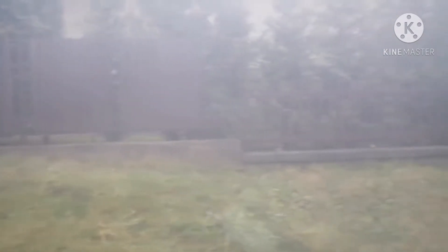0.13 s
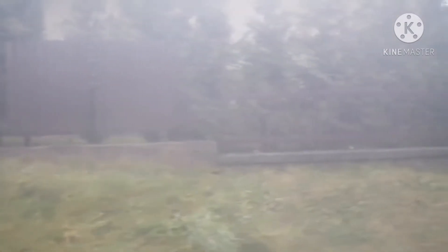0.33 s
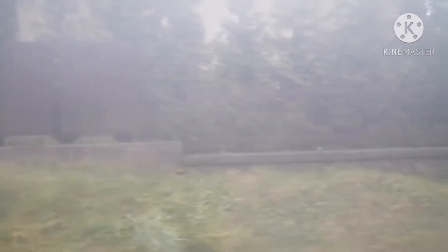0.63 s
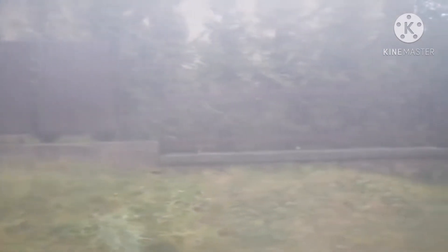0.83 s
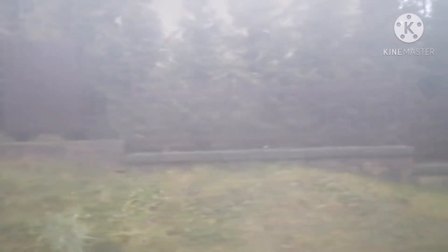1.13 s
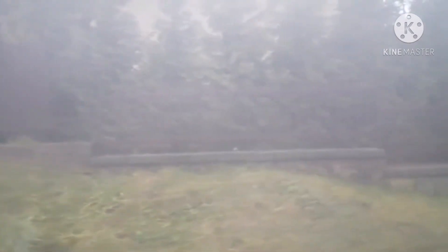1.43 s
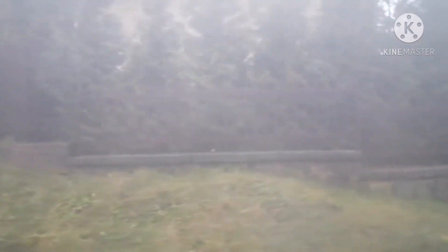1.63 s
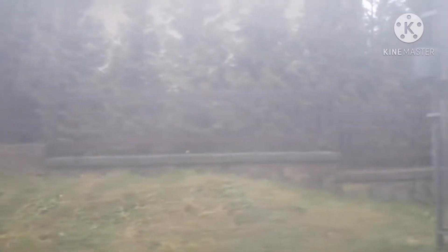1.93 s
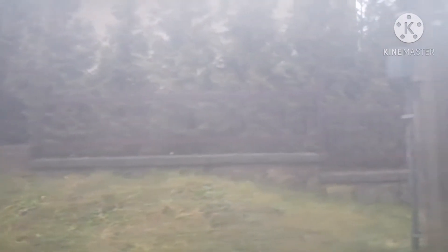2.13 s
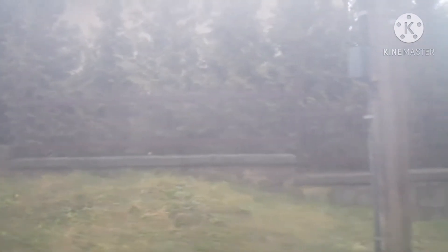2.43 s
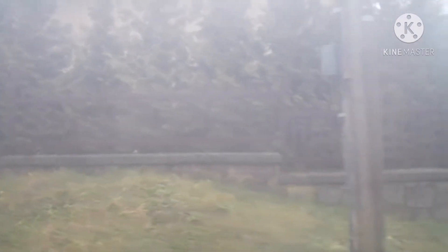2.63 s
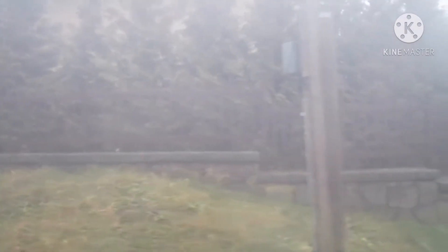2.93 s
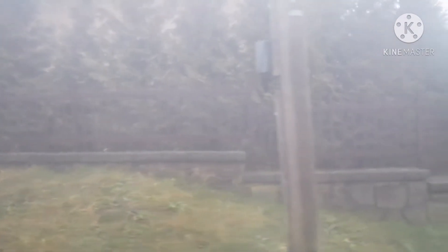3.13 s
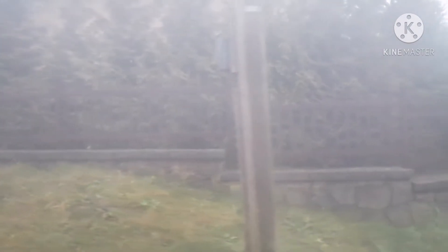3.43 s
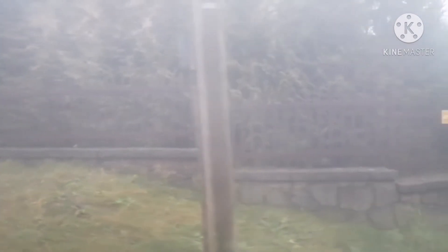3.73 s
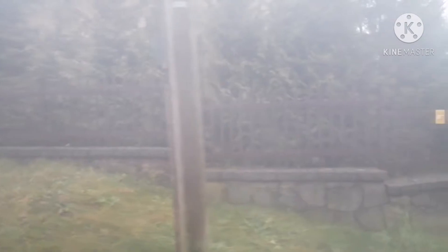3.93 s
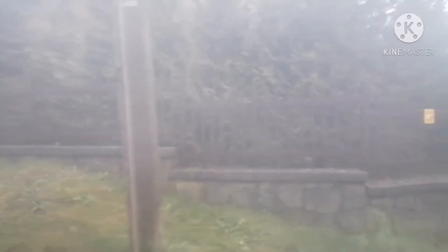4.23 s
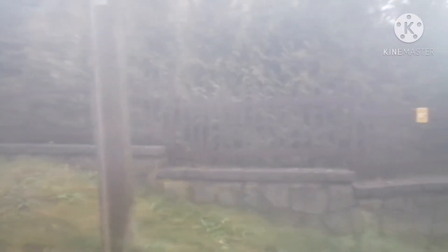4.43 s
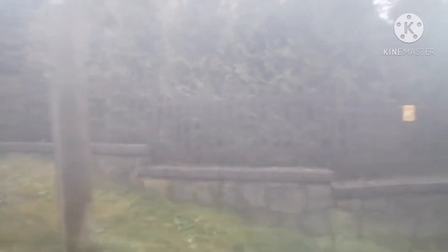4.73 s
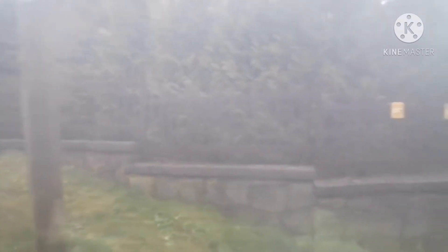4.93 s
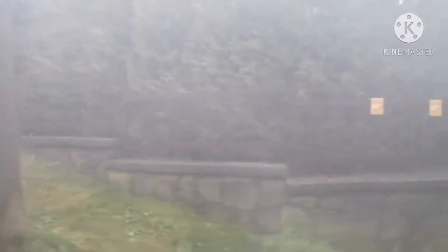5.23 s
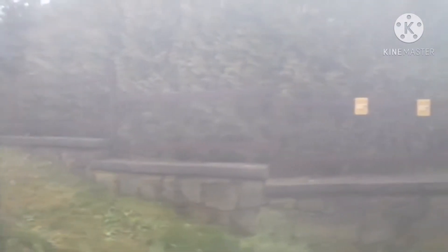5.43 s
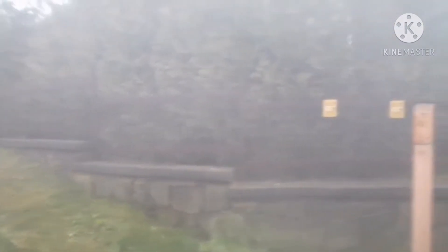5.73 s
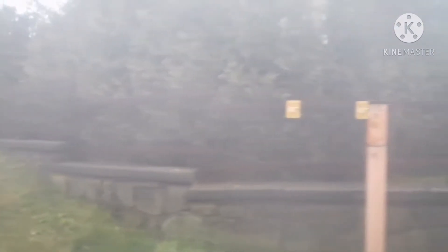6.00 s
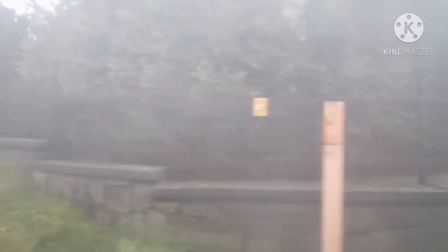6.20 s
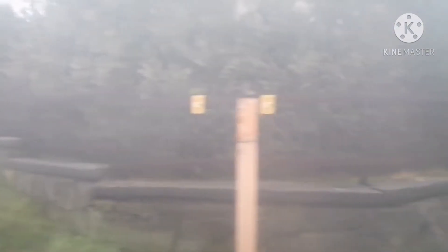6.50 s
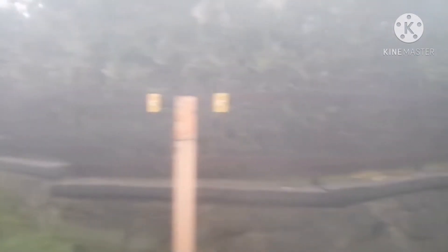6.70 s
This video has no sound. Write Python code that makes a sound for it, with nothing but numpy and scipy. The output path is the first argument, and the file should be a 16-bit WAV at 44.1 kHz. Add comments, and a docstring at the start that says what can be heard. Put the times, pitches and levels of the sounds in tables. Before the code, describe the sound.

Bus cabin interior: steady diesel hum and tyre rumble with small squeaks and air puffs, then a surging, louder, climbing engine roar.

```python
"""Diesel bus, inside the cabin

A four-cylinder diesel drones over road rumble, then revs up, booms and chugs, heard at two microphone ports.
Engine and pump are tones locked to one crankshaft angle, sent through the resonant bodywork; road, roar and air
are coloured noise. Panels and squeaks are jittery tones; puffs, clicks and soft low thumps are short bursts.
Air hisses and whistles in the intake at high revs, and a thin leak whistles earlier on.
"""
import sys
import numpy as np
from scipy import signal
from scipy.fft import rfft, irfft
from scipy.io import wavfile

SR = 44100
rng = np.random.default_rng(int(sys.argv[2]) if len(sys.argv) > 2 else 0)


def dump(signal):
    """Clip the signal to [-1, 1] and save it as 16-bit WAV at the path in sys.argv[1]."""
    limited = np.clip(np.atleast_2d(signal).T, -1, 1)
    pcm = np.round(limited * 32767).astype(np.int16)
    wavfile.write(sys.argv[1], SR, pcm)


N = 302526
T, HZ = np.arange(N) / SR, np.fft.rfftfreq(N, 1 / SR)  # time (s) and spectrum axis (Hz)

# Engine speed as it coasts, picks up, eases, then revs hard: time_s, speed_turns_per_s
ENGINE_SPEED = [(0, 31.1), (0.7, 30.8), (2.4, 29.3), (3.86, 29.9), (4.0, 34), (4.12, 35.7), (4.27, 37.1),
                (4.36, 37.6), (4.68, 38.3), (5.02, 37.9), (5.18, 35.9), (5.47, 35.8), (5.63, 37.6),
                (5.79, 39), (6.0, 44.8), (6.3, 48.8), (6.86, 53)]


def crankshaft():
    """Crankshaft speed (turns per second) and the angle (turns) it adds up to, with a slight random waver."""
    speed = follow(ENGINE_SPEED)[0]
    turns = np.cumsum(speed * (1 + 0.002 * drift(10.2))) / SR
    return speed, turns


CRUISE_TURNS_PER_S = 30
# Crank shake, uneven firing and firing: cycles_per_turn
FIRING_ORDERS = [.97, 1.5, 2]
# Strengths of those orders: cruise_db, rise_db (per doubling of revs), throttle_share (dB per dB of throttle)
FIRING_LEVELS = [(-39.5, 5, 0), (-49.5, 16, 3.5), (-40.5, 8.5, 2)]
# Force of the firing pulses as the throttle opens and closes: time_s, force_db
THROTTLE = [(0, -0.5), (3.98, 2.5), (4.07, 1), (4.24, -2), (4.32, 0.5), (5.12, -0.5), (5.2, -10),
            (5.53, -0.5), (5.64, -1.5), (5.78, 1.5), (5.84, -7), (6.02, 1.5), (6.28, 0), (6.4, -3.5),
            (6.56, -0.5), (6.86, -5)]
# Weaker engine orders: cycles_per_turn, cruise_db
ORDER_LINES = [(2.5, -58.5), (3, -48), (3.5, -53), (4, -47.5), (4.5, -47), (5, -52.5), (6, -52.5),
               (7.5, -55), (8, -52), (10.5, -56.5), (14, -65.5)]


def engine(turns, speed, rev_db=5, firing_flutter_db=1.0, order_flutter_db=2.5):
    """Crank shake, firing and the pump's whine change with the revs and reach the cabin through the bodywork."""
    doublings = np.log2(speed / CRUISE_TURNS_PER_S)
    throttle_db = follow(THROTTLE)[0]
    hum = np.zeros(N)
    for order, (cruise_db, rise_db, throttle_share) in zip(FIRING_ORDERS, FIRING_LEVELS):
        level_db = cruise_db + rise_db * doublings + throttle_share * throttle_db
        hum += partial(turns, order, level_db, firing_flutter_db)
    for order, cruise_db in ORDER_LINES:
        half_order = round(2 * order) / 2
        hum += partial(turns, half_order, cruise_db + rev_db * doublings, order_flutter_db)
    hum += pump(turns, doublings)
    carried = rfft(signal.fftconvolve(hum, irfft(bodywork(), N)[:SR])[:N])
    return ports(carried, carried)


PUMP_PER_TURN = 5.8  # pump cycles per crankshaft turn
PUMP_FLUTTER_DB, SLIP_TURNS = 1.8, .0075  # waver of level (dB) and of angle (turns) as the drive slips
# Partials of the whine, first upward: cruise_db, rise_db (per doubling of revs), load_share (dB per dB of load)
PUMP_PARTIALS = [(-48, 12, 0), (-48.5, -8.5, 1), (-52.5, -33, -0.5)]
# Load on the pump: time_s, load_db
PUMP_LOAD = [(0, 0), (3.99, 0), (4.06, 15), (4.25, 16), (4.41, 18), (4.5, 14.8), (5.15, 15.5), (5.21, 5),
             (5.28, 14), (5.35, 13), (5.42, 17.5), (5.5, 8), (5.68, 5), (5.76, -2), (6.15, 3), (6.45, 2)]


def pump(turns, doublings, throb=0.27):
    """An engine-driven pump whines in harmonics of its own rate, which slips a little against the crankshaft."""
    pump_turns = turns + SLIP_TURNS * drift(6.0)
    load_db = follow(PUMP_LOAD)[0]
    whine = np.zeros(N)
    for harmonic, (cruise_db, rise_db, load_share) in enumerate(PUMP_PARTIALS, start=1):
        level_db = cruise_db + rise_db * doublings + load_share * load_db
        whine += partial(pump_turns, harmonic * PUMP_PER_TURN, level_db, PUMP_FLUTTER_DB)
    return whine * (1 + throb * np.cos(2 * np.pi * turns))  # throbs once a turn


def partial(turns, multiple, db, flutter_db):
    """One engine-locked line whose strength is a little unsteady."""
    level = gain_of(db + flutter_db * drift(23.0))
    return np.sqrt(2) * level * np.sin(2 * np.pi * (multiple * turns + rng.random()))


# Bodywork resonances that boom or sing as an engine line sweeps through: pitch_hz, width_hz, lift_db
BODY = [(46.3, 12.4, 8.5), (75.77, 7.5, 17), (96, 3.4, 10), (183.1, 12.2, 4.5), (229.8, 43, 6.5),
        (339, 8.1, 5), (430, 73, 0), (533.5, 5.5, 18)]


def bodywork():
    """Response of the bodywork: each resonance takes a moment to build up and to die away."""
    return gain_of(sum(db / (1 + 2j * (HZ - hz) / width) for hz, width, db in BODY))


# Colour of the engine roar: pitch_hz, density_db (relative dB per Hz)
ROAR_COLOUR = [(15, -21), (60, 6.5), (130, 2), (200, -2.5), (300, -2.5), (365, -19.5), (430, -1.5),
               (540, -7), (640, -13.5), (810, -7), (940, -18), (1200, -19.5), (1750, -34.5), (2200, -26.5),
               (3600, -65.5), (8000, -77.5), (15000, -62.5)]
# Load on the engine, heard as its roar: time_s, level_db
ENGINE_LOAD = [(0, -39.5), (1.6, -44.5), (2.4, -81), (3.9, -61), (4.08, -36), (4.45, -39), (5.1, -36),
               (5.75, -32), (5.92, -29.5), (6.12, -28.5), (6.42, -29.5), (6.65, -28.5), (6.86, -32)]
SURGE_DB = 1.2  # random surges of the roar
CHUG, CHUG_SHARPNESS = 1.0, 2  # one cylinder hits harder every second turn: depth and sharpness in the roar
PUSH_DB = -10.5  # that cylinder's low push, beside the roar


def roar(turns, pulsing=0.16, growl_db=-3):
    """Combustion roar follows the load, surges, pulses with the firing and chugs every second turn."""
    chug = np.exp(CHUG_SHARPNESS * (np.cos(np.pi * turns) - 1))
    beat = evened(1 + pulsing * np.cos(4 * np.pi * turns) + CHUG * chug)
    combustion = cabin_noise(ROAR_COLOUR) + gain_of(growl_db) * growl(turns)
    together = combustion * beat + gain_of(PUSH_DB) * push(turns)
    return together * gain_of(follow(ENGINE_LOAD)[0] + SURGE_DB * drift(23))


def growl(turns, size=96, lowest_hz=150):
    """The cylinders' uneven pressure pattern repeats every two turns: half orders that climb with the revs."""
    pattern = rng.standard_normal(size)
    drive = np.interp(turns / 2 % 1, np.arange(size) / size, pattern, period=1)
    shape = cabin(ROAR_COLOUR) * (1 - np.exp(-(HZ / lowest_hz) ** 4))
    comb = rfft(evened(irfft(rfft(drive) * shape, N)))
    return ports(comb, comb)


def push(turns, decay_turns=0.29, lowest_hz=40, highest_hz=550):
    """The hardest cylinder shoves the cabin air once every two turns."""
    shove = rfft(np.exp(-(turns % 2) / decay_turns))
    shove = shove * (1 - np.exp(-(HZ / lowest_hz) ** 4)) * np.exp(-(HZ / highest_hz) ** 2)
    return evened(ports(shove, shove))


# Brief singing tones of panels, some gliding, mostly while the engine pulls or revs hard:
# start_s, length_s, pitch_hz, width_hz, glide_hz_per_s, level_db, left_right_db
SINGING = [(0.15, 0.42, 537, 13, -13, -42.5, -3), (4.25, 0.31, 518.4, 13.6, 39.5, -37.5, -6),
           (5.2, 0.4, 1044, 66, 132.5, -44.5, 1), (5.367, 0.11, 2110, 25, -4, -56, 5),
           (5.59, 0.14, 1115, 48, 2.5, -45.5, -1), (5.621, 0.26, 1588, 20, -28, -51, 3.5),
           (5.837, 0.28, 392, 6.1, 80, -39.5, -0.5), (5.949, 0.26, 534.3, 54, 43, -33.5, -1),
           (5.971, 0.22, 700, 97, 150, -38, 1), (6.25, .28, 397, 7.2, 72, -37.5, 0),
           (6.386, .11, 295, 19, 60, -31.5, 2), (6.528, 0.16, 298.3, 7.4, 0, -32.5, 6),
           (6.55, 0.27, 518, 82, -80, -40.5, 3), (6.599, .2, 800, 66, 0, -45, -5)]


def singing(turns, edge=0.33, flutter_db=0.9, throb=0.13):
    """Panels sing briefly in unsteady tones that throb with the engine's two-turn cycle."""
    out = np.zeros((2, N))
    for s, length, hz, width, glide, db, side in SINGING:
        at, _, tone = wavering(s, length, hz, width, glide)
        out[:, at] += gain_of(db) * pan(side) * swell(s, length, edge)[at] * tone
    return out * gain_of(flutter_db * drift(30)) * (1 + throb * np.cos(np.pi * turns))


# Intake whistles: pitch_hz, width_hz, above_flow_db, fray (extra dB per dB of flow)
INTAKE = [(8725, 90, 7, 0), (8700, 330, 5, 0.7), (10885, 110, -12, -0.1)]
# Intake flow at high revs, heard as hiss and whistle: time_s, level_db
INTAKE_FLOW = [(5.95, -100), (6.07, -75), (6.14, -68.5), (6.31, -65), (6.43, -67), (6.56, -70), (6.67, -69),
               (6.74, -82), (6.86, -74)]
# Colour of the intake hiss: pitch_hz, density_db (relative dB per Hz)
FIZZ_COLOUR = [(4000, -4), (8000, 6), (9700, -25), (11000, -3), (13000, -3), (14500, 1), (15500, -4)]
FIZZ_DB, FIZZ_PER_FLOW = -63.5, 0.4  # hiss level at the strongest flow (dB), dB per dB of flow


def intake(flicker_db=1.0):
    """Intake air hisses and whistles unsteadily at high revs; the whistle frays as the flow peaks."""
    flow_db = follow(INTAKE_FLOW)[0]
    below_db = flow_db - flow_db.max()
    tones = np.zeros((2, N))
    for hz, width, db, fray in INTAKE:
        tones += gain_of(flow_db + db + fray * below_db) * whistle(hz, width)
    hiss = airy(gain_of(read(FIZZ_COLOUR))) * gain_of(FIZZ_DB + FIZZ_PER_FLOW * below_db)
    hiss *= T > INTAKE_FLOW[0][0]
    return (tones + hiss) * gain_of(flicker_db * drift(45))


# Air puffs: start_s, length_s, rush_db, valve_ring_db, left_right_db
PUFFS = [(1.386, 0.074, -52.5, -62, -3), (1.8, 0.17, -57.5, -75, 1), (3.447, .07, -53.5, -70, -2),
         (3.5, 0.42, -63, -71, -4), (4.815, 0.165, -61, -52.5, -1), (6.439, 0.17, -50, -67, -2)]
# Colour of the rushing air: pitch_hz, density_db (relative dB per Hz)
RUSH_COLOUR = [(1500, 1), (2900, 6.5), (4000, -3), (5400, 0), (7100, 6.5), (8500, -7.5), (11000, -11.5),
               (15500, -24)]
# Resonances of the air valve: pitch_hz, width_hz, level_db (relative)
VALVE = [(5420, 1200, 0), (6750, 910, -5)]


def puffs(edge=0.27, sputter_db=2.0):
    """Air rushes out in sputtering bursts and rings the valve that it passes."""
    rush = airy(gain_of(read(RUSH_COLOUR)))
    ring = airy(sum(gain_of(db) * bell(hz, width) ** 4 for hz, width, db in VALVE))
    air = np.zeros((2, N))
    for s, length, rush_db, ring_db, side in PUFFS:
        burst = gain_of(rush_db) * rush + gain_of(ring_db) * ring
        air += swell(s, length, edge) * pan(side) * burst
    return air * gain_of(sputter_db * drift(130))


# Squeaks and brief panel rings:
# start_s, length_s, pitch_hz, width_hz, glide_hz_per_s, level_db, left_right_db
SQUEAKS = [(1.339, .145, 2935, 130, -550, -42, -1), (1.341, .04, 5200, 600, 0, -49, -5),
           (1.338, .04, 7230, 220, 0, -46, 6), (1.354, .045, 5200, 200, 0, -54, -5),
           (1.364, .045, 7230, 220, 0, -45, 6), (1.406, .12, 7150, 420, 0, -52, 5),
           (1.445, .075, 5330, 200, 0, -51.5, 0), (1.475, .03, 7300, 200, 0, -55, 3),
           (3.446, .13, 5130, 400, 0, -54, -3), (3.5, .8, 5200, 300, 0, -61, -6),
           (4.856, 0.056, 764, 180, 0, -35.5, 5), (6.595, .06, 7980, 100, 0, -57, 2),
           (6.75, .35, 5540, 25, 0, -63, -10)]


def squeaks(attack_share=0.055, rasp_db=2, rasp_hz=200):
    """Fittings and panels rub: each slip starts abruptly and fades, in a jittery, rasping tone that may glide."""
    out = np.zeros((2, N))
    for s, length, hz, width, glide, db, side in SQUEAKS:
        at, progress, tone = wavering(s, length, hz, width, glide)
        envelope = np.minimum(progress / attack_share, 1) * (1 - progress) ** 2
        out[:, at] += gain_of(db) * pan(side) * envelope * tone
    return out * gain_of(rasp_db * drift(rasp_hz))


# Clicks of loose fittings: start_s, level_db (at the strike), left_right_db
CLICKS = [(2.156, -49, 3), (4.757, -46.5, 17), (4.857, -44, 20), (4.936, -31.5, 13), (6.107, -41, 13),
          (6.5654, -40, 11)]
# Colour of a click: pitch_hz, density_db (relative dB per Hz)
CLICK_COLOUR = [(1500, -1), (2700, 0.5), (3700, -16), (4400, -6), (5400, 5), (6000, 5), (6900, 15),
                (7800, -6), (10000, -9.5), (13500, -8), (16000, -16)]
CRACK_S, TICK_RING_S, TICK_RING_DB = 0.00079, 0.008, -17  # decays of crack and ring (s), ring against crack (dB)


def clicks():
    """Dry ticks of noise: a sharp crack and a ring of a few milliseconds."""
    blows = np.zeros((2, N))
    for s, db, side in CLICKS:
        age = abs(T - s)
        decay = np.exp(-age / CRACK_S) + gain_of(TICK_RING_DB) * np.exp(-age / TICK_RING_S)
        blows += gain_of(db) * pan(side) * (T >= s) * decay
    return blows * airy(gain_of(read(CLICK_COLOUR)))


# Low thumps and short swells of engine bass: centre_s, pitch_hz, half_length_s, level_db
THUMPS = [(2.804, 142, 0.013, -21), (4.125, 233, 0.026, -23.5), (5.879, 194, 0.011, -23),
          (6.03, 44, 0.096, -19), (6.22, 159, 0.024, -28.5), (6.41, 207, 0.011, -19),
          (6.43, 44.4, 0.071, -25.5)]


def thumps(side_db=6):
    """Soft thumps and bass swells, stronger on the left: one low tone each, rising and fading smoothly."""
    bursts = np.zeros(N)
    for s, hz, half_length, db in THUMPS:
        envelope = np.exp(-((T - s) / half_length) ** 2)
        bursts += gain_of(db) * envelope * np.cos(2 * np.pi * hz * (T - s))
    return pan(side_db) * bursts


LEAK_HZ, LEAK_S, LEAK_LENGTH_S, LEAK_DB = 7750, 1.6, 2.2, -72  # pitch, start, length, level


def leak(width_hz=25, edge=.06):
    """A thin, faint whistle of escaping air: a very narrow band of noise with soft ends."""
    return whistle(LEAK_HZ, width_hz) * gain_of(LEAK_DB) * swell(LEAK_S, LEAK_LENGTH_S, edge)


# Colour of the road noise: pitch_hz, density_db (relative dB per Hz)
ROAD_COLOUR = [(5, -10.5), (15, 0.5), (70, 2), (105, -7), (190, -3.5), (330, -5), (420, -11.5),
               (750, -14.5), (950, -21), (1500, -30), (2100, -36), (3000, -42), (3800, -50), (9000, -61.5)]
ROAD_DB = -30


def road(bumps_db=0.5):
    """Tyres rumble over an uneven road: low noise in the cabin with a slightly bumpy level."""
    return cabin_noise(ROAD_COLOUR) * gain_of(ROAD_DB + bumps_db * drift(35))


# Colour of the ventilation air: pitch_hz, density_db (relative dB per Hz)
AIR_COLOUR = [(2060, -25.5), (3500, -9.5), (4040, -7.5), (5180, -0.5), (5940, 0), (6860, 3.5), (7340, -5),
              (8110, -8), (8910, -15.5), (9960, -15), (12800, -21.5), (14600, -18.5), (15500, -22.5)]
AIR_DB = -59.5


def ventilation():
    """Ventilation air hisses almost steadily: high noise throughout the cabin."""
    return cabin_noise(AIR_COLOUR) * gain_of(AIR_DB + .5 * drift(8))


# Likeness of the two microphone ports: pitch_hz, likeness (below 0 counts as 0)
SAME = [(60, 1), (110, 1), (200, 0.76), (380, 0.7), (700, 0.47), (1290, 0.18), (2380, -0.026),
        (4400, 0.029), (8120, -0.11), (15000, -0.03)]


def cabin_noise(spectrum):
    """Diffuse noise in the cabin, only partly alike at the two ports."""
    a, b = rfft(airy(cabin(spectrum)))
    same = np.clip(read(SAME), 0, 1)
    return ports(a, same * a + np.sqrt(1 - same ** 2) * b)


# Cabin resonances: pitch_hz, width_hz, lift_db
CABIN = [(183.4, 14.6, 6), (222.7, 14, 7.5), (405, 12, -0.5), (515, 64, 2.5), (1087, 75, 9.5),
         (1255, 12, 8), (1570, 250, 5.5), (2160, 84, 2), (3054, 730, 7), (5180, 250, 2.5), (7240, 190, 7)]


def cabin(spectrum):
    """A spectrum lifted by the cabin's resonances."""
    return gain_of(read(spectrum) + sum(db * bell(hz, width) ** 2 for hz, width, db in CABIN))


# Tilt between the microphone ports: pitch_hz, left_right_db
LEAN = [(30, 0), (70, 6.5), (200, 6.5), (330, 8.5), (400, -1), (420, -12.5), (442, 0.5), (700, -1.5),
        (2400, 0.5), (4400, -3), (8000, .5)]
# Phase gap between the ports: pitch_hz, left_lead_radians
LEAD = [(30, -.1), (80, -.2), (200, -.4), (500, -.2), (750, -1.5), (1000, -3), (1300, -3.6), (1900, -0.5),
        (2900, -0.5), (4500, 1), (6000, -2), (7300, 0), (7750, 3.5), (8700, 3.6), (11000, -1)]


def ports(left, right):
    """Two spectra reach the microphone ports with a tilt and a phase gap; bass is stronger on the left."""
    lean = gain_of(read(LEAN) / 2)
    return irfft(np.array([left * lean, right / lean * np.exp(-1j * read(LEAD))]), N)


def whistle(hz, width, likeness=0.56):
    """A fuzzy tone from one spot, partly alike at both ports."""
    a, b = rfft(airy(bell(hz, width) ** 2))
    return ports(a, likeness * a + np.sqrt(1 - likeness ** 2) * b)


def wavering(s, length, hz, width, glide):
    """A jittery, gliding tone: its sample places, its progress 0-1 and its wave at both ports."""
    at = np.flatnonzero((T >= s) & (T < s + length))
    age = T[at] - s
    slowness = np.exp(-(np.fft.rfftfreq(SR, 1 / SR) / width) ** 2)
    jitter = evened(irfft(rfft(rng.standard_normal((2, SR))) * slowness, SR))
    pitch = hz + glide * age + width / 2 * jitter[:, at % SR]
    return at, age / length, np.sqrt(2) * np.sin(2 * np.pi * np.cumsum(pitch, axis=1) / SR)


def gain_of(db):
    """Decibels to amplitude."""
    return 10 ** (np.asarray(db) / 20)


def evened(x):
    """Scales to rms 1."""
    return x / np.sqrt(np.mean(x ** 2) + 1e-20)


def read(points, hz=HZ):
    """A spectrum table on a log-frequency axis."""
    f, value = np.transpose(points)
    return np.interp(np.log(hz + 1), np.log(f + 1), value)


def follow(rows):
    """Each column of a curve table, sample by sample."""
    s, *columns = np.transpose(rows)
    return [np.interp(T, s, c) for c in columns]


def bell(hz, width):
    """Magnitude of one resonance."""
    return 1 / np.sqrt(1 + (2 * (HZ - hz) / width) ** 2)


def noise(shape):
    """Noise of rms 1, coloured by the given magnitude spectrum."""
    return evened(irfft(rfft(rng.standard_normal(N)) * shape, N))


def airy(shape):
    """Noise that is unrelated at the two ports."""
    return np.array([noise(shape), noise(shape)])


def drift(rate):
    """Random wander of rms 1, slower than about the given rate (Hz)."""
    return noise(np.exp(-(HZ / rate) ** 2))


def pan(db):
    """Left and right gains."""
    return gain_of([[db / 2], [-db / 2]])


def swell(s, length, edge):
    """A gate with soft edges, each taking the given share of its length."""
    u = (T - s) / length
    return np.sin(np.pi / 2 * np.clip(np.minimum(u, 1 - u) / edge, 0, 1))


def scene():
    """Engine, roar, singing panels and intake air, the small sounds around them, and the road and air behind."""
    speed, turns = crankshaft()
    main = engine(turns, speed) + roar(turns) + singing(turns) + intake()
    small = puffs() + squeaks() + clicks() + thumps() + leak()
    return main + small + road() + ventilation()


EDGE_HZ = 15600  # top of the recorder's band


def record(dry):
    """The recorder's band limit: a steep low-pass filter."""
    lowpass = signal.firwin(511, EDGE_HZ, window=("kaiser", 9), fs=SR)
    return signal.oaconvolve(dry, lowpass[None], "same")


dry = scene()
out = record(dry)
dump(out)
```